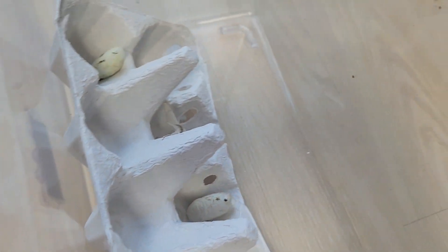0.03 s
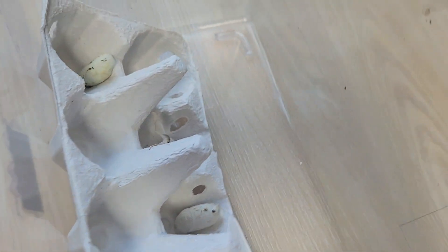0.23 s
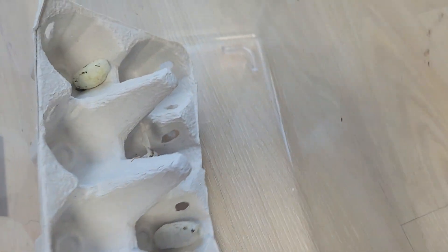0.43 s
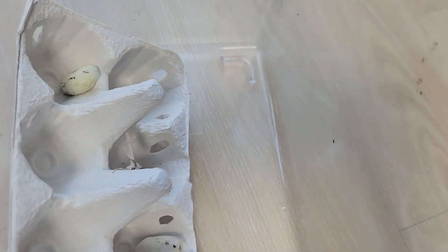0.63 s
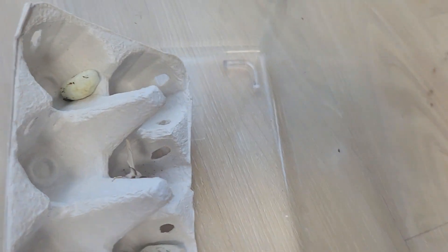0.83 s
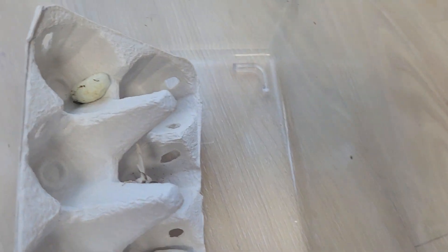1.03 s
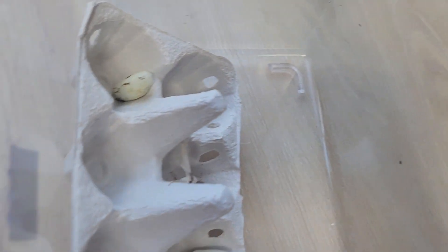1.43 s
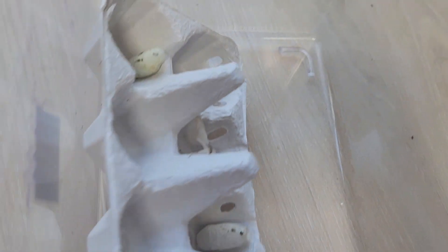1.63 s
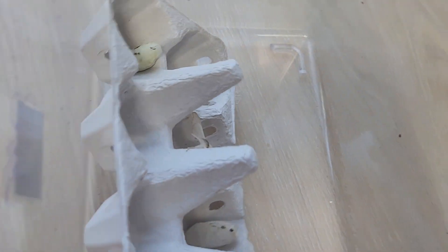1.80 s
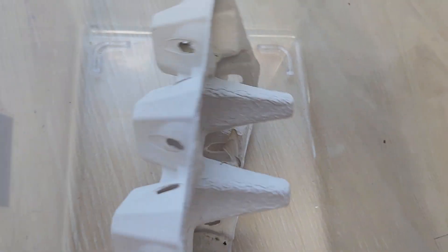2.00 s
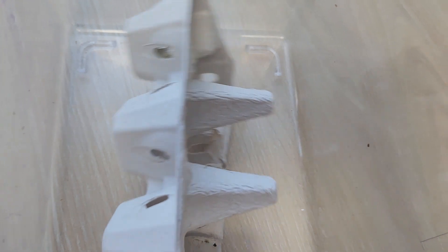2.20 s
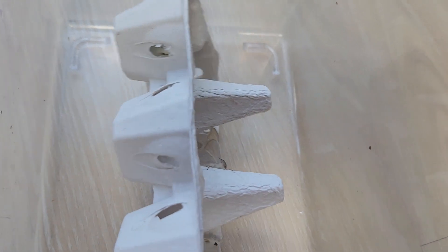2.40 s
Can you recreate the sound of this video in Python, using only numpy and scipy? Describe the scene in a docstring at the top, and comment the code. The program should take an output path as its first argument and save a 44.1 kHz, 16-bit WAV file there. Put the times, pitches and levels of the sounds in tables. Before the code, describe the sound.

An egg carton is pushed about in a plastic box with a dry hiss and a cluster of hollow knocks. After a lull it drags again, juddering, knocking and rasping over a low handling rumble, heard up close indoors.

```python
"""A pulp egg carton is pushed about and tilted inside a thin plastic box on a wooden floor, close by.
Sliding friction makes the pulp hiss; stick-slip motion drives the modes of carton and box into a hollow
judder and two short low groans. Knocks ring the same modes and set the thin walls clattering. A dragged
edge rasps and the plastic ticks. Behind them lie the low boom of the handled box and the air of a quiet
small room, all heard through the two ports of a microphone."""
import sys
import numpy as np
from scipy import signal
from scipy.fft import rfft, irfft, next_fast_len
from scipy.io import wavfile
from scipy.ndimage import map_coordinates

SR = 44100
rng = np.random.default_rng(int(sys.argv[2]) if len(sys.argv) > 2 else 0)


def unload_audio(sound):
    """Save the sound as a 16-bit wav file, at the path given as the first command line argument."""
    columns = np.transpose(np.atleast_2d(sound))
    # keep every value between -1 and 1, then stretch to whole-number steps
    steps = np.round(np.clip(columns, -1, 1) * 32767)
    wavfile.write(sys.argv[1], SR, steps.astype(np.int16))


N = 112454

# Sliding strength of the first push and the long drag. Each row: time in seconds, level in dB.
PUSH_LEVELS = [(.13, -82), (.165, -55), (.235, -49), (.26, -45), (.33, -41.5), (.47, -37.5), (.605, -50.5),
               (.625, -70)]
DRAG_LEVELS = [(.85, -65), (1.05, -65), (1.19, -50.5), (1.34, -57.5), (1.6, -56), (1.66, -46), (1.9, -46.5),
               (2.05, -55), (2.19, -48), (2.34, -56.5), (2.55, -63.5)]
# Spectra of the rubbing pulp. Each row: frequency in Hz, relative level in dB.
PUSH_SPECTRUM = [(250, -40), (600, -1), (3000, 1.5), (3750, -7), (6200, -3.5), (8400, -11), (12500, -3.5),
                 (16000, -12)]
DRAG_SPECTRUM = [(250, -48), (600, -0.5), (1900, -6.5), (2870, -.5), (3500, -8), (5500, -9.5), (8500, -16),
                 (12000, -14.5), (16000, -24.5)]
# The carton slips free. Each row: centre in seconds, half length in seconds, level in dB.
SWISHES = [(.637, .008, -43.5), (.834, .022, -50.5), (1.408, 0.045, -52.5), (2.095, .022, -48.5),
           (2.276, .02, -49), (2.445, 0.01, -54)]
# Modes of carton and box. Each row: frequency in Hz, relative level in dB, 60 dB decay time in seconds.
BODY_MODES = [(81.3, -6.5, 0.31), (165.66, 3, 0.3), (182, -2, 0.2), (194, 4, 0.044), (271, -5.5, 0.51),
              (311.6, 6.5, 0.067), (362.9, -2.5, 0.23), (504.6, -8, 0.11), (637, -8.5, 0.037),
              (861.2, -2.5, 0.14), (1115.6, -5, 0.16)]
# Strength of the stick-slip judder. Each row: time in seconds, level in dB.
JUDDER_LEVELS = [(0, -37.5), (.06, -58.5), (.22, -52), (.27, -28), (.5, -24.5), (.58, -33), (1.14, -41.5),
                 (1.27, -29.5), (1.42, -35), (1.54, -44), (1.93, -26), (2.06, -28.5), (2.22, -41),
                 (2.55, -55)]
# Impacts on the box. Each row: start in seconds, then relative thump, hollow, clack and crack in dB.
KNOCKS = [(.247, -16, -23, -29, -34), (.351, -15.5, -16.5, -24.5, -31), (0.374, -44, -12, -26.5, -44),
          (0.434, -20, -34, -34, -60), (0.456, -24, -16.5, -26.5, -36), (0.465, -13.5, -39.5, -34.5, -53),
          (0.488, -26, -20.5, -28.5, -60), (0.645, -16, -20.5, -25.5, -29), (0.748, -21, -25.5, -37, -39),
          (.879, -25.5, -29.5, -41, -46.5), (.968, -28, -31.5, -49.5, -53),
          (1.174, -17.5, -18.5, -32.5, -37), (1.195, -43, -20, -37, -55), (1.251, -31, -57, -43.5, -38),
          (1.569, -36, -23, -42, -63), (1.665, -47, -34, -34.5, -49), (1.674, -31, -18.5, -59, -65),
          (1.751, -47, -24.5, -44, -63), (1.787, -21.5, -17.5, -30, -33), (1.822, -44, -30, -31, -82),
          (1.867, -33.5, -10.5, -22, -37.5), (2.101, -39, -19, -37, -67)]
# Corners of a knock's spectrum in Hz: thump, hollow, clack from, clack to, crack, roll-off.
KNOCK_CORNERS_HZ = [180, 370, 540, 1100, 2600, 7000]
# Low groans. Each row: peak time in seconds, level in dB.
GROANS = [(0.841, -33), (1.993, -23.5)]
# Rasps of a dragged edge. Each row: centre in seconds, half length in seconds, level in dB.
RASPS = [(1.405, 0.041, -60), (2.2, 0.11, -51)]
# Plastic ticks. Each row: start in seconds, level in dB, centre in Hz, width in octaves.
TICKS = [(.784, -53.5, 6300, 0.29), (1.023, -48.5, 2420, 0.19), (1.247, -36.5, 12000, 8),
         (2.035, -45, 2170, 0.34)]
# Strength of the box's boom. Each row: time in seconds, level in dB.
BOOM_LEVELS = [(0, -39), (1.6, -42.5), (1.92, -32), (2.55, -50)]
# Spectra of the boom and the room air. Each row: frequency in Hz, relative level in dB.
BOOM_SPECTRUM = [(25, -19), (60, -4), (78, 2), (100, -10.5), (500, -60.5)]
AIR_SPECTRUM = [(300, 5), (2400, -9.5), (4000, -34), (16000, -60)]
# Unequal sensitivity of the ports. Each row: frequency in Hz, left minus right in dB.
PORT_BALANCE = [(200, 1.73), (1300, 0), (2400, -9.5), (4400, -10), (9000, -1.5)]

FIBRES_PER_S, FIBRE_SCATTER_DB = 13000, 4.5
MODE_HZ = np.array(BODY_MODES)[:, 0]


def rubbing(strength, spectrum, drift=.04, flex_hz=4, flutter_db=1.7, flutter_hz=67):
    """Sliding friction: fibres catch and hiss through wall resonances that shift as the carton flexes."""
    fibres = shape(impulses(FIBRES_PER_S, FIBRE_SCATTER_DB), wall_resonances)
    flexed = np.cumsum(1 + drift * wander(flex_hz))  # an uneven reading speed moves the resonances
    hiss = np.array([map_coordinates(port, [flexed], order=3, mode="mirror") for port in fibres])
    pressure = amp(flutter_db * wander(flutter_hz))
    return colour(hiss, spectrum) * strength * pressure


def wall_resonances(f, ripple_db=2.2, step_hz=110):
    """Modal overlap: close, irregular wall resonances put a ripple on the gain."""
    hz = np.arange(0, SR / 2, step_hz)
    return amp(ripple_db * np.interp(f, hz, rng.standard_normal(len(hz))))


def judder(knee_hz=340, db_per_octave=-7.5, deep_db=3, deep_db_per_s=-4):
    """Stick-slip: each slip rings the body softly; the lowest modes weaken as the carton is raised."""
    weight = amp(db_per_octave * np.maximum(np.log2(MODE_HZ / knee_hz), 0))
    deep = MODE_HZ < 300
    slips = impulses(per_s=420, scatter_db=2)
    responses = [(weight * part) @ body_modes() for part in (deep, ~deep)]
    low, high = (signal.fftconvolve(slips, ring[None], axes=1)[:, :N] for ring in responses)
    weakening = amp(deep_db + deep_db_per_s * np.arange(N) / SR)
    return unit(low * weakening + high) * curve(JUDDER_LEVELS)


def body_modes():
    """Free vibration: each mode of carton and box is a damped sine."""
    t = np.arange(SR // 3) / SR
    return np.array([amp(db) * fade(t, t60) * np.sin(2 * np.pi * hz * t) for hz, db, t60 in BODY_MODES])


def knocks(contact_s=0.0018, ring_db=-4, clatter_db=-9.5, slap_db=-7, rolloff_db=-19.5):
    """Impact excitation: each knock rings the body modes and a dense, short clatter of the thin walls."""
    modes = body_modes()
    t = np.arange(modes.shape[1]) / SR
    contact = 1 - np.exp(-t / contact_s)
    ring, clatter, walls = np.zeros(N), 0, noise()
    hits = []
    for start, thump, hollow, clack, crack in KNOCKS:
        spectrum = list(zip(KNOCK_CORNERS_HZ, [thump, hollow, clack, clack, crack, crack + rolloff_db]))
        add(ring, start, -contact * (amp(db_at(spectrum, MODE_HZ)) @ modes))
        hits.append((start, spectrum))
    for hz in 240 * 2 ** np.arange(0, 5.1, .5):  # half-octave bands
        t60 = 0.16 * (1000 / hz) ** 0.067  # higher bands die slightly sooner
        decay = contact * (fade(t, t60) + amp(slap_db) * fade(t, t60 / 4))
        power = np.zeros(N)  # overlapping clatters add in power
        for start, spectrum in hits:
            add(power, start, (amp(db_at(spectrum, hz)) * decay) ** 2)
        clatter = clatter + np.sqrt(power) * band(walls, hz, octaves=0.36)
    return amp(ring_db) * ring + amp(clatter_db) * clatter


def radiated(x, cutoff_hz=143):
    """Radiation efficiency: walls small against the wavelength give off little deep bass."""
    return signal.sosfilt(signal.butter(3, cutoff_hz, "high", fs=SR, output="sos"), x)


def groans(pitch_hz=172.2, sag_hz_per_s=52, wobble=0.019, rise_s=0.028, fall_s=0.068):
    """Mode locking: slips fall briefly in step with the main low resonance, giving a sagging tone."""
    out = 0
    for peak, db in GROANS:
        t = np.arange(N) / SR - peak
        hz = (pitch_hz - sag_hz_per_s * t) * (1 + wobble * wander(hz=41))
        swell = np.exp(-(t / np.where(t < 0, rise_s, fall_s)) ** 2)
        out = out + amp(db) * swell * unit(np.sin(2 * np.pi * np.cumsum(hz) / SR))
    return out


def rasps():
    """Resonant filtering: a dragged edge chatters in a narrow, almost squeaky band."""
    return swells(RASPS) * band(impulses(FIBRES_PER_S, FIBRE_SCATTER_DB), hz=2860, octaves=0.13)


def ticks(t60=0.048):
    """Damped transients: the plastic gives short, bright bursts of noise."""
    out, source = np.zeros((2, N)), noise()
    t = np.arange(SR // 5) / SR
    for start, db, hz, octaves in TICKS:
        add(out, start, amp(db) * fade(t, t60) * band(source, hz, octaves)[:, :len(t)])
    return out


def box_boom():
    """Forced vibration: the handled box gives a low rumble that swells and fades."""
    return curve(BOOM_LEVELS) * colour(noise(), BOOM_SPECTRUM)


def room(x, t60=0.31, gap_s=0.0074, tail_db=-9, top_hz=3400):
    """Reverberation: the diffuse reflections of a small room add a short, dull tail."""
    t = np.arange(N) / SR
    tail = (noise() * fade(t, t60) * (t > gap_s))[:, :SR // 2]
    tail = tail / np.sqrt(np.sum(tail ** 2) / 2)
    dull = shape(x, lambda f: 1 / np.hypot(1, f / top_hz))
    return x + amp(tail_db) * signal.fftconvolve(dull, tail, axes=1)[:, :N]


def room_air(level_db=-56.5):
    """Ambient noise: a faint, steady, dull hush."""
    return amp(level_db) * colour(noise(), AIR_SPECTRUM)


def ports(pair, shared_below_hz=945, lag_s=0.00045, share=0.17):
    """Coherence: two unrelated signals become left and right, alike in the bass, apart in the treble."""
    angle = lambda f: np.pi / 4 / np.sqrt(1 + (shared_below_hz / f) ** 3.4)
    lagged = shape(pair[0], lambda f: 1j * np.sqrt(2) * np.sin(2 * np.pi * f * lag_s))
    difference = share * lagged + np.sqrt(1 - share ** 2) * pair[1]  # a share arrives out of step
    mid = shape(pair[0], lambda f: np.cos(angle(f)))
    side = shape(difference, lambda f: np.sin(angle(f)))
    return np.array([mid + side, mid - side])


def impulses(per_s, scatter_db):
    """Shot noise: tiny random impulses of uneven size, as the two ports hear them."""
    occurs = rng.random((2, N)) < per_s / SR
    size = amp(scatter_db * rng.standard_normal((2, N)))
    sign = np.sign(rng.standard_normal((2, N)))
    return ports(occurs * size * sign)


def noise():
    """White noise as the two ports hear it."""
    return ports(rng.standard_normal((2, N)))


def wander(hz):
    """Low-pass noise: a smooth random drift at rms 1."""
    return unit(shape(rng.standard_normal(N), lambda f: np.exp(-(f / hz) ** 2)))


def amp(db):
    """Decibels to amplitude ratio."""
    return 10 ** (np.asarray(db) / 20)


def unit(x):
    """Normalisation to rms 1."""
    return x / np.sqrt(np.mean(x ** 2))


def fade(t, t60):
    """Exponential decay by 60 dB in t60 seconds."""
    return np.exp(-np.log(1000) * t / t60)


def curve(points):
    """Amplitude envelope through (s, dB) points, silent outside them."""
    s, db = np.array(points).T
    return amp(np.interp(np.arange(N) / SR, s, db, left=-120, right=-120))


def swells(rows):
    """Amplitude envelope of Gaussian swells."""
    t = np.arange(N) / SR
    return sum(amp(db) * np.exp(-((t - centre) / half) ** 2) for centre, half, db in rows)


def db_at(points, hz):
    """Interpolation of (Hz, dB) points on a log-frequency axis."""
    f, db = np.array(points).T
    return np.interp(np.log(hz), np.log(f), db)


def shape(x, gain):
    """Linear filtering by a gain that is a function of frequency."""
    size = next_fast_len(N + 8192, True)
    hz = np.maximum(np.fft.rfftfreq(size, 1 / SR), 1)
    return irfft(rfft(x, size) * gain(hz), size)[..., :N]


def colour(x, points):
    """Spectral shaping by (Hz, dB) points, at rms 1."""
    return unit(shape(x, lambda f: amp(db_at(points, f))))


def band(x, hz, octaves):
    """Gaussian band-pass filtering, at rms 1."""
    return unit(shape(x, lambda f: np.exp(-2 * (np.log2(f / hz) / octaves) ** 2)))


def add(out, start_s, sound):
    """Superposition of a sound from a given time."""
    i = max(int(start_s * SR), 0)
    out[..., i:i + sound.shape[-1]] += sound[..., :N - i]


def scene():
    """Superposition: sliding, juddering and knocking in the room, over the low boom and still air."""
    swishes = swells(SWISHES)
    push = rubbing(curve(PUSH_LEVELS) + swishes, PUSH_SPECTRUM)
    drag = rubbing(curve(DRAG_LEVELS) + swishes, DRAG_SPECTRUM)
    handling = push + drag + radiated(judder() + knocks()) + ticks() + groans() + rasps()
    return room(handling) + box_boom() + room_air()


def record(dry, top_hz=15900):
    """Frequency response: the right port is brighter in the presence range, and the top is cut."""
    split = np.array([[.5], [-.5]])
    heard = shape(dry, lambda f: amp(split * db_at(PORT_BALANCE, f)))
    return signal.sosfilt(signal.ellip(10, .2, 70, top_hz, fs=SR, output="sos"), heard)


dry = scene()
out = record(dry)
unload_audio(out)
```